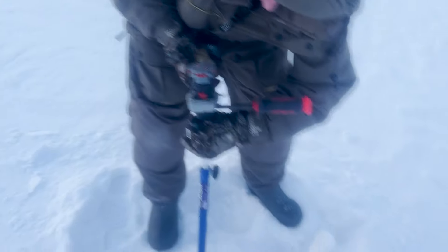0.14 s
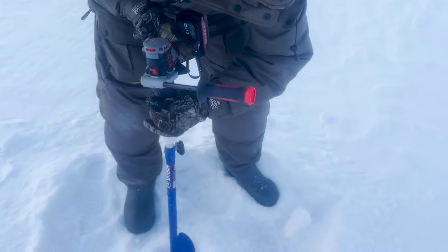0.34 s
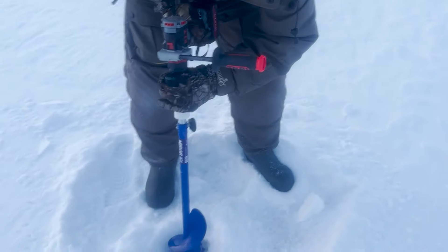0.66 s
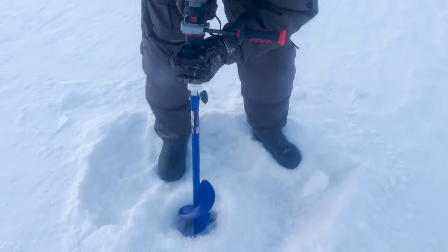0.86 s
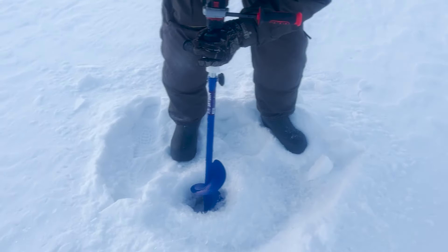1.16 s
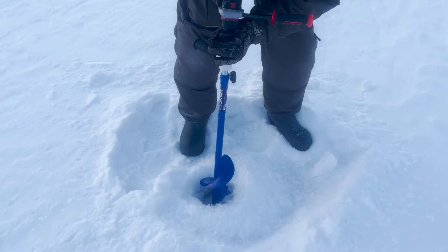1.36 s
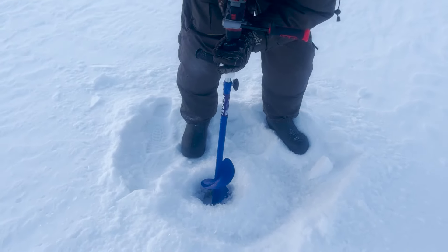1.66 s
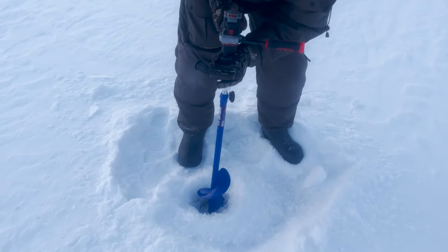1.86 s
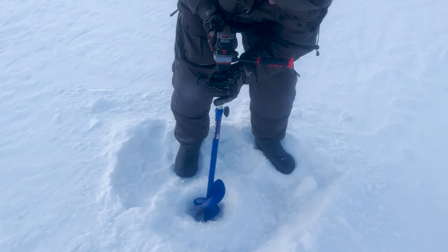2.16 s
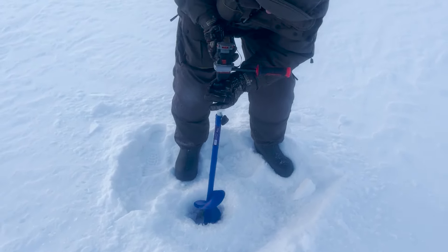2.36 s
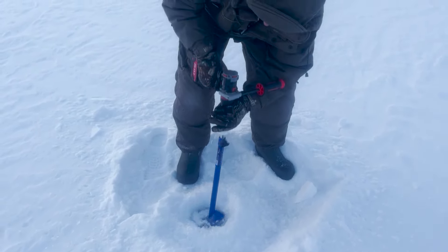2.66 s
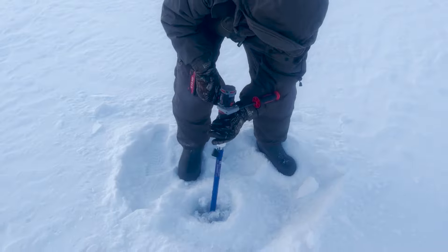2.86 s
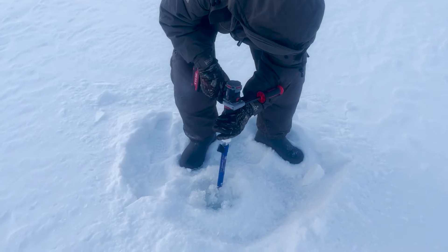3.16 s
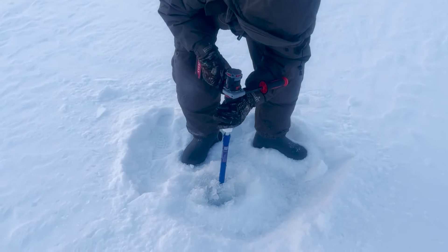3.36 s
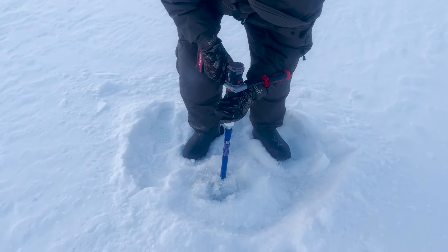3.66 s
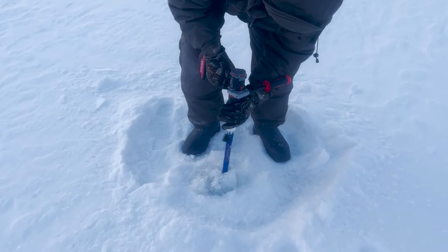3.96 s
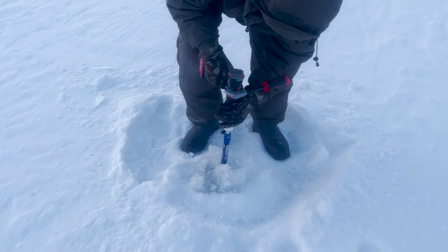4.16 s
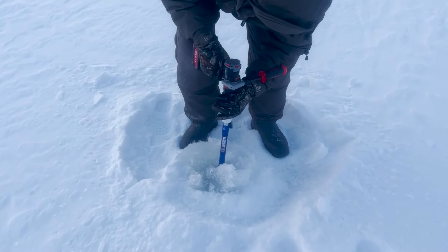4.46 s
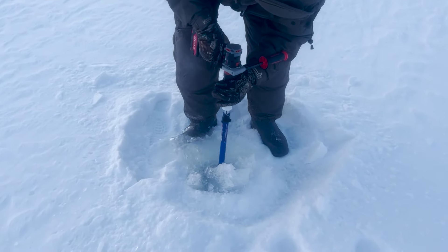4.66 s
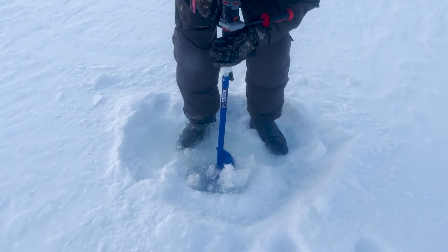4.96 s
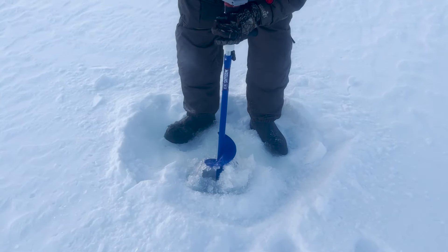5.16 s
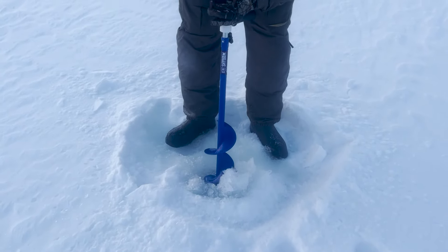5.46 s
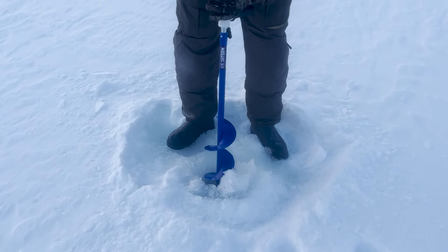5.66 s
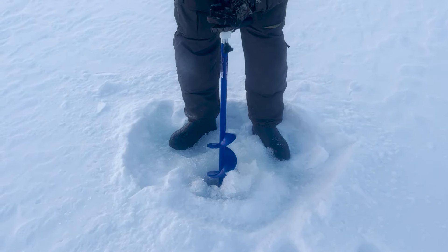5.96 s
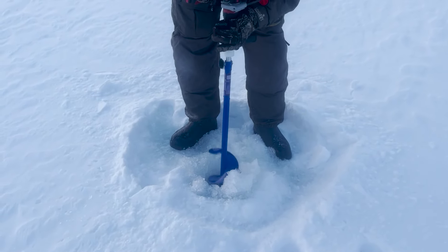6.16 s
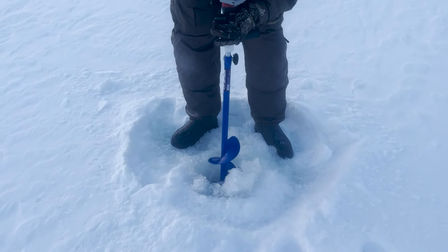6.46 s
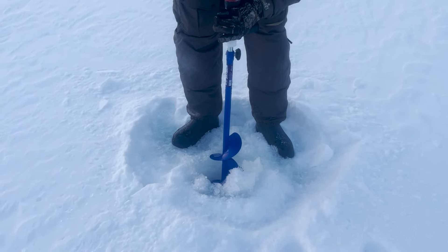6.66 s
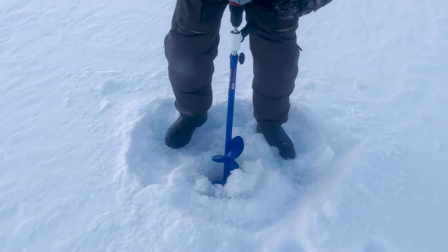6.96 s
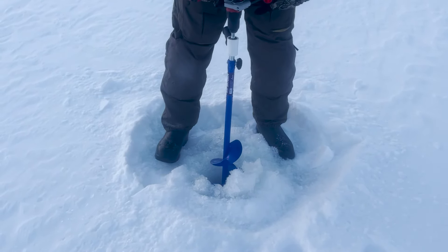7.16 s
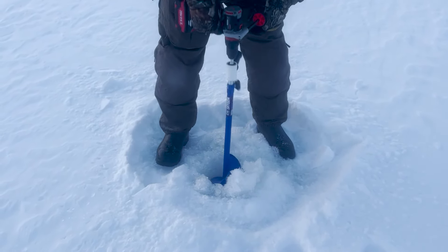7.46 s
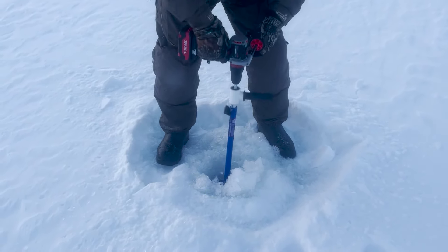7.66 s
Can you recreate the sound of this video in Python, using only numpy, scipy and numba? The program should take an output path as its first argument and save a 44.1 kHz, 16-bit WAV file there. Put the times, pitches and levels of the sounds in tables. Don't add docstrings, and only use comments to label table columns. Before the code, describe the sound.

A cordless drill already whining stops almost at once, leaving wind thumps and faint loose-ice rustle. Longer bursts follow, the motor labouring as blades crunch ice, with sharp clutch and ice cracks. Slush slaps as the auger is raised; a short, violent fourth burst nearly stalls among loud wet knocks, and a fifth runs lighter and higher. Close, dry stereo microphone in open snow.

```python
import sys
import numpy as np
from scipy import signal
from scipy.fft import rfft, irfft, next_fast_len
from scipy.io import wavfile
from scipy.ndimage import uniform_filter1d
from numba import njit

SR = 44100
rng = np.random.default_rng(int(sys.argv[2]) if len(sys.argv) > 2 else 0)


def amplitude_ratio(level_db):
    exponent = np.asarray(level_db, float) / 20
    return 10 ** exponent


def to_wav(s):
    ch = np.atleast_2d(s).T
    pcm = np.round(np.clip(ch, -1, 1) * 32767)
    wavfile.write(sys.argv[1], SR, pcm.astype(np.int16))


N = 344729


def rms_one(x):
    return x / np.sqrt(np.mean(x ** 2) + 1e-20)


def evened(x, seconds):
    power = uniform_filter1d(x ** 2, size=round(seconds * SR))
    return rms_one(x / np.sqrt(power + 1e-20))


def in_time(rows):
    s, *columns = np.transpose(rows)
    return [np.interp(np.arange(N) / SR, s, c) for c in columns]


def swells(rows, rise, fall):
    t = np.arange(N) / SR
    levels = []
    for (s, hold, db), down in zip(rows, np.broadcast_to(fall, len(rows))):
        before, after = np.clip(s - t, 0, None), np.clip(t - s - hold, 0, None)
        levels.append(db - rise * before - down * after)
    return np.max(levels, axis=0)


def coloured(x, spectrum):
    size = next_fast_len(N)
    hz, db = np.transpose(spectrum)
    grid = np.arange(size // 2 + 1) * SR / size
    gain = amplitude_ratio(np.interp(np.log(grid + 1), np.log(hz), db, left=-70, right=-70))
    return rms_one(irfft(rfft(x, size) * gain, size)[:N])


def drift(rate):
    r = np.exp(-2 * np.pi * rate / SR)
    return rms_one(signal.lfilter([1], [1, -2 * r, r * r], rng.standard_normal(N + SR))[SR:])


def resonance(x, hz, width_hz):
    r = np.exp(-np.pi * width_hz / SR)
    poles = [1, -2 * r * np.cos(2 * np.pi * hz / SR), r * r]
    return signal.lfilter([(1 - r * r) / 2, 0, (r * r - 1) / 2], poles, x)


@njit
def moving_resonance(x, hz, r, sr):
    y = np.zeros(len(x))
    for i in range(2, len(x)):
        drive = (1 - r * r) / 2 * (x[i] - x[i - 2])
        y[i] = drive + 2 * r * np.cos(2 * np.pi * hz[i] / sr) * y[i - 1] - r * r * y[i - 2]
    return y


def grains(per_s, spread_db):
    sizes = amplitude_ratio(spread_db * np.minimum(rng.exponential(1, N), 5)) * rng.choice([-1, 1], N)
    return sizes * (rng.random(N) < per_s / SR) + 1e-18


def add(out, s, sound):
    i = round(s * SR)
    out[i:i + len(sound)] += sound[:N - i]


def knocks(events, rise_cycles, ring_cycles):
    out, t = np.zeros(N), np.arange(SR // 16) / SR
    for (s, db, hz), phase in zip(events, rng.uniform(0, 2 * np.pi, (len(events), 1))):
        shape = (1 - np.exp(-t * hz / rise_cycles)) ** 2 * np.exp(-t * hz / ring_cycles)
        add(out, s, amplitude_ratio(db) * shape / shape.max() * np.sin(2 * np.pi * hz * t + phase))
    return out


def snaps(events, spectrum, fade_s):
    out, t = np.zeros(N), np.arange(SR // 40) / SR
    for (s, db), noise in zip(events, rng.standard_normal((len(events), len(t)))):
        add(out, s, amplitude_ratio(db) * noise * np.exp(-t / fade_s))
    return coloured(out, spectrum) * np.sqrt(np.mean(out ** 2)) * amplitude_ratio(-1.0)


# hz, level_db (per Hz)
CHANNEL_NOISE = [(2000, -40), (4500, 11), (5000, 6), (5600, -1), (8000, -13), (13500, -16.5), (14100, -40)]


def channel_hiss(hiss_db):
    return amplitude_ratio(hiss_db - 14.0) * np.array([coloured(x, CHANNEL_NOISE) for x in rng.standard_normal((2, N))])


# full_s, hold_s, level_db
FIZZ_SWELLS = [
    (.36, .42, -68),
]
# hz, level_db (per Hz)
FIZZ_SPECTRUM = [(5300, -23), (5800, 0), (6300, -4), (6800, -20)]


def fizz():
    return amplitude_ratio(swells(FIZZ_SWELLS, 900, 60)) * coloured(rng.standard_normal(N), FIZZ_SPECTRUM)


# hz, level_db (per Hz)
CHIRP_SPECTRUM = [(9000, -12), (11500, -4), (13500, 2), (14500, -6), (15850, 7)]


def chirp(hiss_db):
    first_s, every_s, level_db = .078, .2146, -52.5
    since = (np.arange(N) / SR - first_s) % every_s
    shape = np.clip(since / 0.0021, 0, 1) * np.exp(-(since / 0.044) ** 2)
    quiet = np.clip((-44 - hiss_db) / 6, 0, 1)
    floor = amplitude_ratio(np.minimum(hiss_db, -59) - 9)
    return quiet * (amplitude_ratio(level_db) * shape + floor) * coloured(rng.standard_normal(N), CHIRP_SPECTRUM)


# peak_s, hold_s, level_db
WIND_GUSTS = [(0, 0.17, -23.5), (.33, 0.028, -23.5), (.55, 0.014, -26), (.82, 0.16, -32),
              (1.27, 0.068, -32.5), (1.5, 0.16, -38), (1.8, 0.32, -41), (2.5, 0.025, -40),
              (2.74, 0.77, -36.5), (3.45, 0.059, -40), (3.75, 0.069, -42), (4.1, 0.22, -34.5),
              (4.65, 0.028, -41), (5.0, 0.21, -45), (5.8, 0.087, -40.5), (6.25, 0.22, -41.5),
              (6.64, 0.22, -37.5), (7.19, .01, -34.5), (7.41, 0.18, -33), (7.6, 0.14, -37)]
# hz, level_db (per Hz)
WIND_SPECTRUM = [(22, -35), (40, -5), (55, -2.5), (67, 4.5), (85, -2), (150, -5), (300, -11), (480, -21),
                 (800, -27)]


def wind():
    calm_db = -47.5
    wind_db = np.maximum(swells(WIND_GUSTS, rise=76, fall=105), calm_db)
    eddies, air = drift(8.9), coloured(rng.standard_normal(N), WIND_SPECTRUM)
    low = signal.sosfiltfilt(signal.butter(2, 100, fs=SR, output="sos"), air)
    lumps = amplitude_ratio(6.1 * np.roll(eddies, SR)) * low + amplitude_ratio(6.6 * eddies) * (air - low)
    return amplitude_ratio(wind_db) * evened(lumps, seconds=0.15)


# start_s, peak_db, pitch_hz
WIND_SLAPS = [(0.056, -28, 183), (0.104, -10.5, 154), (0.104, -6.5, 302), (0.151, -17, 155),
              (0.25, -18.5, 145), (0.353, -17.5, 296), (0.439, -36, 258), (0.484, -15, 360),
              (0.522, -15.5, 228), (0.607, -28, 148), (0.792, -33, 149), (0.85, -23, 285),
              (0.879, -25, 177), (1.193, -28.5, 277), (1.251, -25, 294), (1.315, -34, 237),
              (1.488, -27, 187), (1.596, -25.5, 184), (1.682, -25, 153), (1.898, -34, 160),
              (0.374, -14.5, 141), (2.534, -15, 235), (2.789, -18, 260), (3.048, -21.5, 210),
              (4.029, -21.5, 296), (4.231, -25.5, 132), (6.659, -29, 328), (7.173, -25, 292),
              (7.183, -13.5, 443), (7.194, -33, 317), (1.93, -39, 198), (1.975, -34, 188),
              (3.07, -20.5, 327.4), (7.423, -13, 410)]
# start_s, peak_db, pitch_hz
WIND_SLAP_TOPS = [(0.074, -18, 406), (0.121, -11.5, 352), (0.372, -17, 386), (3.046, -22.5, 365),
                  (0.448, -34, 576), (0.508, -20.5, 494), (0.793, -23, 412), (1.49, -25, 590),
                  (1.683, -31.5, 410), (1.806, -32, 810), (5.576, -36, 765)]


def slaps():
    thumps = knocks(WIND_SLAPS, rise_cycles=0.7, ring_cycles=0.66)
    return thumps + knocks(WIND_SLAP_TOPS, rise_cycles=0.78, ring_cycles=0.98)


# start_s, peak_db
CLOTH_SNAPS = [(1.2271, -38), (1.2497, -31.5), (1.323, -46), (1.4212, -40), (1.8068, -52), (1.963, -52),
               (2.0023, -44), (2.1792, -48), (3.26, -52), (5.409, -35), (5.7188, -35.5), (6.9268, -51)]
# hz, level_db (per Hz)
CLOTH_SPECTRUM = [(500, 22.5), (1500, 7.5), (5000, 7.5), (12000, -6), (16000, 0)]


def crackle():
    return snaps(CLOTH_SNAPS, CLOTH_SPECTRUM, fade_s=0.0058)


# start_s, peak_db
SHARP_CRACKS = [
    (3.2031, -21),
    (4.2174, -11.5),
    (4.7744, -22),
    (5.1364, -28),
    (5.3208, -26),
    (6.4544, -24),
    (6.5144, -24),
    (6.7002, -33),
]
# hz, level_db (per Hz)
CRACK_SPECTRUM = [(900, -7), (2600, 6), (5000, -3), (9000, -9), (14000, -12)]


def cracks():
    return amplitude_ratio(-6) * snaps(SHARP_CRACKS, CRACK_SPECTRUM, fade_s=0.0043)


# time_s, level_db, hole_hz
LOOSE_ICE = [(0.35, -45.5, 440), (.46, -59, 430), (.56, -47, 433), (.7, -50, 426), (.98, -47, 407),
             (1.02, -50, 420), (1.22, -52, 417), (1.37, -47, 395), (1.6, -49.5, 392), (1.66, -58.5, 400),
             (2.15, -66, 412), (2.36, -56, 350), (2.44, -44, 300), (2.49, -39, 260), (2.505, -55, 240),
             (2.53, -38.5, 240), (3.16, -36, 281), (3.24, -44, 264), (3.37, -46, 260), (3.385, -61, 253),
             (3.435, -66, 253), (3.455, -44.5, 260), (3.76, -48, 355), (3.93, -36, 262), (4.4, -37, 293),
             (4.7, -41, 524), (4.74, -46, 1840), (4.8, -36.5, 940), (4.89, -38.5, 465), (5.05, -38.5, 420),
             (5.2, -39.5, 580), (5.33, -40.5, 550), (5.39, -42.5, 536), (5.45, -46.5, 550),
             (5.56, -50, 567), (6.55, -39, 540), (6.575, -48.5, 410), (6.9, -53, 433), (7.19, -48, 456),
             (7.225, -45, 450), (7.25, -60, 910), (7.315, -46, 870), (7.335, -30.5, 804), (7.82, -48, 680)]
# full_s, hold_s, level_db, fall_db_per_s
CUTS_AND_SCRAPES = [(1.964, 0.0061, -55.5, 800), (2.058, 0.075, -54, 500), (2.184, 0.15, -48, 306),
                    (0.294, 0.054, -39, 904), (4.783, 0.069, -35, 200), (1.815, .002, -47.5, 1500),
                    (2.539, .02, -26, 100), (2.58, .01, -20.5, 149), (2.803, 0.0025, -26.5, 600),
                    (5.971, 0.023, -20.5, 250), (6.032, 0.092, -16.5, 292), (6.215, 0.035, -18.5, 77),
                    (6.378, 0.025, -24, 400), (7.024, 0.065, -46, 200), (4.767, 0.015, -36.5, 300),
                    (7.276, 0.016, -39, 300), (7.342, 0.0076, -36, 300), (7.415, 0.0068, -23, 83),
                    (7.468, 0.16, -26.5, 72)]


def ice_levels():
    loose_db, hole_hz = in_time(LOOSE_ICE)
    cuts = np.array(CUTS_AND_SCRAPES)
    return np.maximum(loose_db, swells(cuts[:, :3], rise=450, fall=cuts[:, 3])), hole_hz


# hz, level_db (per Hz)
ICE_SPECTRUM = [(150, -73), (300, -3.5), (600, 5.5), (1300, 9), (2000, 6), (3500, 1), (6000, -8)]


def ice(ice_db, hole_hz):
    chips = grains(per_s=3500 * amplitude_ratio(2.8 * drift(30)), spread_db=3.2)
    pitches = np.geomspace(300, 4500, 18)
    dealt = rng.integers(0, len(pitches), N)
    pieces = np.zeros(N)
    for k, hz in enumerate(pitches):
        pieces += resonance(chips * (dealt == k) + 1e-18, hz, hz / 13) * np.sqrt(1000 / hz)
    crunch = coloured(rms_one(pieces) + amplitude_ratio(-4.0) * rms_one(chips), ICE_SPECTRUM)
    r = np.exp(-np.pi * 90 / SR)
    hole = rms_one(moving_resonance(chips, hole_hz, r, SR))
    return amplitude_ratio(ice_db) * evened(amplitude_ratio(6.0) * crunch + amplitude_ratio(0.5) * hole, seconds=0.099)


# start_s, peak_db, pitch_hz
CHIP_KNOCKS = [(2.526, -24.5, 703), (2.568, -26, 1750), (2.613, -15.5, 1560), (2.7, -26, 670),
               (2.788, -25, 800), (3.887, -34, 1760), (3.949, -28, 1210), (4.667, -24, 1790),
               (4.852, -28.5, 1050), (4.864, -32, 874), (0.318, -30, 820), (4.683, -33, 540),
               (5.946, -24, 936), (5.976, -8, 609), (6.029, -20, 520), (6.111, -7, 514), (6.214, -23, 462),
               (6.338, -17, 1830), (6.358, -17.5, 457), (6.384, -17.5, 477), (7.612, -17, 565),
               (7.7, -15.5, 768), (4.82, -30.5, 617), (6.511, -22, 523), (6.539, -25, 570),
               (7.262, -23.5, 1500), (7.257, -25.5, 1094), (7.33, -34, 723), (7.257, -36, 282),
               (7.258, -34, 720), (7.338, -32, 327), (7.401, -19.5, 1250), (7.535, -22.5, 553),
               (7.561, -16, 792), (7.613, -16.5, 785), (7.668, -21.5, 756)]


def chip_knocks():
    return knocks(CHIP_KNOCKS, rise_cycles=1.0, ring_cycles=7.3)


# start_s, peak_db, pitch_hz
SLUSH_SLAPS = [(2.522, -16, 252), (2.549, -14, 239.4), (2.572, -22, 252), (2.592, -22, 242),
               (2.715, -22, 260), (2.745, -26, 252.5), (2.865, -26.5, 241), (2.594, -10, 1540),
               (2.649, -12, 1120), (3.154, -23, 1900), (4.789, -29, 1020), (4.957, -25.5, 615),
               (5.005, -41, 510), (5.029, -27, 385), (5.076, -30, 402), (5.127, -26.5, 452),
               (5.159, -23.5, 517), (5.184, -24, 563), (5.215, -26, 605), (5.289, -41, 860),
               (5.322, -23.5, 746), (5.408, -26, 515), (5.017, -31, 1150), (5.08, -32, 800),
               (6.308, -19, 390), (5.957, -12, 1070), (5.962, -12.5, 586), (5.995, -0.5, 565),
               (6.044, -9.5, 532), (6.063, -5, 523), (6.076, -9.5, 620), (6.091, -9, 510),
               (6.127, -10, 510), (6.139, -6, 568), (6.231, -10, 517), (6.249, -8.5, 1090),
               (6.261, -11, 485), (6.289, -13.5, 573), (6.299, -9.5, 1040), (6.32, -15, 1230),
               (6.344, -12, 1900), (6.454, -17.5, 500), (6.479, -24, 446), (7.429, -14, 1560),
               (7.579, -15, 856)]


def slush():
    return amplitude_ratio(-7) * knocks(SLUSH_SLAPS, rise_cycles=1.05, ring_cycles=5.7)


# start_s, peak_db, pitch_hz
STEEL_TAPS = [(0.3357, -20, 5060), (0.7931, -39, 2300), (0.9814, -41, 1910), (1.3663, -39, 1700),
              (1.961, -46, 1370), (3.2037, -23, 5100), (3.808, -20, 2650), (4.2168, -10, 2555),
              (4.751, -19, 2760), (4.7744, -24, 4980), (5.016, -40, 1200), (5.1347, -30, 1530),
              (5.3218, -35, 1470), (6.0796, -12, 2300), (6.0944, -17, 2210), (6.1114, -29, 1430),
              (6.5788, -35, 3800), (6.6089, -48, 1130), (6.6294, -45.5, 1260), (6.7002, -34, 2970),
              (6.8942, -52, 1290), (6.9255, -42, 1610), (7.018, -39, 1790), (7.1501, -46, 1700)]


def taps():
    return amplitude_ratio(-6) * knocks(STEEL_TAPS, rise_cycles=0.57, ring_cycles=22.0)


# full_s, hold_s, level_db
FLIGHT_RUBS = [
    (2.28, 0.0032, -41),
    (2.44, 0.04, -34.5),
    (2.53, 0.097, -27.5),
    (2.66, 0.084, -32.5),
    (2.8, 0.018, -37),
]


def flight():
    rub = resonance(grains(per_s=1700, spread_db=10.5), hz=659, width_hz=33)
    level_db = swells(FLIGHT_RUBS, rise=500, fall=597)
    return amplitude_ratio(level_db - 5.5) * evened(rub, seconds=0.114)


# pitch_hz, width_hz, level_db
SHELL_MODES = [(2744, 186, 10), (3406, 66, -0.5), (2560, 94, -14), (5620, 510, -5.5)]


def housing(x):
    modes = enumerate(SHELL_MODES)
    return sum((-1) ** k * amplitude_ratio(db) * resonance(x, hz, width) for k, (hz, width, db) in modes)


# full_s, hold_s, level_db
BATTERY_BUZZES = [
    (1.8, 0.09, -59),
    (6.7, .01, -51),
]


def buzz():
    return amplitude_ratio(swells(BATTERY_BUZZES, 600, 400)) * rms_one(housing(grains(per_s=4000, spread_db=1.5)))


# start_s, peak_db, low_part_db
DRILL_TICKS = [(0.332, -49, 2), (2.269, -29, -8), (2.526, -31, -11), (2.7923, -37, 24), (3.2002, -29.5, -4),
               (3.769, -26, -24), (3.9494, -27, -14), (4.217, -25, -11), (4.774, -28, -7),
               (5.8447, -26, -2), (6.42, -27.5, 0), (7.254, -33, 6), (7.267, -23, -1), (7.7957, -36, -4)]


def ticks():
    high, low, t = np.zeros(N) + 1e-18, np.zeros(N) + 1e-18, np.arange(SR // 20) / SR
    for (s, db, low_db), noise in zip(DRILL_TICKS, rng.standard_normal((len(DRILL_TICKS), len(t)))):
        add(high, s, amplitude_ratio(db) * noise * np.exp(-t / 0.0075))
        add(low, s, amplitude_ratio(db + low_db) * noise * np.exp(-t / 0.011))
    return amplitude_ratio(7.0) * housing(high) + amplitude_ratio(-9.0) * high + amplitude_ratio(-21) * resonance(low, 1700, 1000)


# deepest_s, share_of_speed_lost,
# fall_s, recovery_s
BLADE_JAMS = [
    (2.604, .12, 0.043, 0.019),
    (2.739, 0.31, 0.03, 0.024),
    (2.797, .1, 0.0095, 0.045),
    (2.818, .24, 0.0082, .042),
    (7.84, 0.19, 0.04, 0.087),
]


def rotor(burst, load):
    spin_up_s, spin_up_curve, coast_s = 0.105, 1.95, 0.074
    t = np.arange(N) / SR
    press, release, braking, _, _ = burst
    hz, current_db = in_time(load)
    hz = hz * (1 - np.exp(-(np.clip(t - press, 0, None) / spin_up_s) ** spin_up_curve))
    for s, share, fall_s, recover_s in BLADE_JAMS:
        falling = np.clip(1 + (t - s) / fall_s, 0, 1)
        hz = hz * (1 - share * falling * np.exp(-np.clip(t - s, 0, None) / recover_s))
    hz = np.clip(hz - braking * np.clip(t - release, 0, None), 60, None)
    starts = np.clip((t - press + 0.0014) / 0.0022, 0, 1)
    running = starts * np.clip((release + coast_s - t) / 0.0053, 0, 1)
    return uniform_filter1d(hz, size=SR // 110), current_db, running


# press_s, release_s, braking_hz_per_s, gear_mesh_db, fan_db
TRIGGER = [
    (-.5, 0.276, 16900, -34.5, -42),
    (2.272, 3.142, 24200, -34.5, -38.5),
    (3.768, 4.702, 22100, -36, -40.5),
    (5.837, 6.363, 19800, -33, -33.5),
    (7.263, 7.747, 8300, -33.5, -45.5),
]
# time_s, whine_hz at full speed, current_db
BURST_LOAD = [
    [(0, 2850, -5), (.13, 2880, -5.5), (.165, 2908, -1.5), (.2, 2885, -5.5), (.236, 2936, -3.5),
     (.258, 2894, -24), (.278, 2750, -7)],
    [(2.35, 3337, -10), (2.415, 3330, -9), (2.445, 3230, -28), (2.515, 3270, -27), (2.535, 2660, -8),
     (2.555, 2772, 1.5), (2.66, 2607, -1), (3.0, 2645, 2), (3.14, 2730, 1)],
    [(3.95, 2687, 1.5), (4.07, 2664, 0.5), (4.14, 2740, -0.5), (4.22, 2710, 0.5), (4.315, 2760, 1),
     (4.52, 2823, 1), (4.705, 2814, 0)],
    [(6.03, 2712, -2.5), (6.052, 2616, 1.5), (6.078, 1912, -12), (6.104, 1917, -9), (6.122, 2480, 1),
     (6.14, 2600, -3), (6.2, 2743, 2), (6.28, 2783, -2), (6.35, 2800, -3)],
    [(7.42, 2967, -2), (7.465, 2972, -1), (7.53, 3015, 0.5), (7.595, 3010, -2.5), (7.665, 3013, 0.5),
     (7.75, 3135, 8), (7.8, 3180, -3)],
]


def fan():
    total = np.zeros(N)
    for burst, load in zip(TRIGGER, BURST_LOAD):
        hz, _, running = rotor(burst, load)
        total += running * amplitude_ratio(burst[4] + 7.5 * np.log2(hz / 2800))
    return total


# full_s, hold_s, level_db
SLEEVE_RUSTLES = [(.4, 0.056, -60.5), (.56, 0.16, -65), (.74, 0.026, -67), (.9, 0.063, -66),
                  (1.3, 0.17, -72), (1.5, 0.14, -63.5), (3.3, 0.055, -62), (3.47, .08, -57),
                  (6.62, 0.012, -56.5), (6.83, 0.053, -56), (7.05, 0.12, -55)]


def hiss_level(ice_db):
    friction_db, air_db, rustle_db_per_s = -14.5, -77, 117
    rustle_db = swells(SLEEVE_RUSTLES, rustle_db_per_s, rustle_db_per_s)
    power = fan() ** 2 + amplitude_ratio(ice_db + friction_db) ** 2 + amplitude_ratio(air_db) ** 2 + amplitude_ratio(rustle_db) ** 2
    return 10 * np.log10(power)


# hz, level_db (per Hz)
HISS_SPECTRUM = [(300, -40), (1000, 1.5), (2500, 7), (3200, 5.5), (4500, 8.5), (6000, 5.5), (9000, 5),
                 (12500, 2), (13700, 0), (14100, -17), (15800, -40)]
# pitch_hz, width_hz, level_db
GEARBOX_MODES = [(1676, 430, -2.5), (3600, 68, -6.5), (4990, 90, -14.5)]


def hiss(hiss_db):
    air = coloured(grains(per_s=9000, spread_db=-0.5), HISS_SPECTRUM)
    air = air + sum(amplitude_ratio(db + 4) * resonance(air, hz, width) for hz, width, db in GEARBOX_MODES)
    return amplitude_ratio(hiss_db + 6 + 1.61 * drift(45.0) + 1.85 * drift(4.5)) * air


# start_s, share_of_speed_lost
BLADE_BITES = [(.005, 0.02), (0.135, 0.04), (0.2, 0.06), (2.991, 0.011), (3.037, 0.021), (4.021, 0.045),
               (4.061, 0.019), (4.143, 0.031), (4.191, 0.023), (4.209, 0.013), (4.318, 0.063),
               (4.352, 0.023), (4.44, 0.024), (4.534, 0.041), (4.566, 0.013), (4.647, 0.031),
               (4.675, 0.022), (6.222, 0.067), (6.282, 0.073), (7.484, .02), (7.533, 0.018), (7.607, 0.054),
               (7.671, 0.025)]


def sag(fall_s, recover_s):
    lost, t = np.zeros(N), np.arange(SR // 5) / SR
    shape = (1 - np.exp(-t / fall_s)) ** 2 * np.exp(-t / recover_s)
    for s, share in BLADE_BITES:
        add(lost, s, share * shape / shape.max())
    return 1 - lost


# line_hz, level_db
CASE_GAIN = [(800, -10), (1400, -4), (2700, -1), (3200, -3.5), (3700, 1.5), (4400, -1), (5000, -1),
             (5600, -1.5), (7000, -0.5), (9500, -3.5)]


def case(hz):
    return amplitude_ratio(np.interp(hz, *np.transpose(CASE_GAIN)))


WINDING_MULTIPLES = [.5, 1.375, 1.75, 2, 2.5, 2.875]
WINDING_LEVELS = [-32.5, -48, -50, -38.5, -39, -45.5]


def winding_lines(turn, hz, flutter):
    out = np.zeros(N)
    for j, (k, db) in enumerate(zip(WINDING_MULTIPLES, WINDING_LEVELS)):
        strength = amplitude_ratio(db) * np.minimum(k * hz / 2600, 1) ** 2 * case(k * hz)
        out += strength * np.sin(k * turn) * flutter[j % 2]
    return out


# multiple of the whine, level_db (relative to the mesh)
MESH_LINES = [(1.5, -5), (1.626, 6), (1.874, -13), (3.251, 5)]


def mesh_lines(turn, hz, flutter):
    out = np.zeros(N)
    for j, (k, db) in enumerate(MESH_LINES):
        out += amplitude_ratio(db) * case(k * hz) * np.sin(k * turn) * flutter[2 - j % 2]
    return out


# whine_hz, level_db
WHINE_GAIN = [(1000, -69), (1800, -35), (2150, -30), (2350, -25.5), (2600, -17.5), (2780, -19), (2900, -27),
              (3150, -48)]
START_LEVELS = [-1, -10, 3.5, 4.5, 4]
HALF_LEVELS = [-39.5, -37.5, -33.5, -21, -37]


def motor(wobble, shell_db):
    out, upper, t = np.zeros(N), np.zeros(N), np.arange(N) / SR
    rattle = rms_one(housing(grains(per_s=6000, spread_db=-10.0)))
    left = sag(fall_s=.005, recover_s=.03)
    speed = left * (1 + wobble * drift(77.3))
    flutter = [amplitude_ratio(2.4 * drift(15.0)) for k in range(3)]
    regrip_s = 7.798
    for burst, load, start_db, half_db in zip(TRIGGER, BURST_LOAD, START_LEVELS, HALF_LEVELS):
        press, release, _, mesh_db, _ = burst
        hz, current_db, running = rotor(burst, load)
        turn = 2 * np.pi * np.cumsum(hz * speed) / SR
        current = np.clip(np.maximum(release - t, t - regrip_s) / 0.0033, 0, 1)
        starting = np.exp(-((t - press - 0.063) / 0.025) ** 2)
        shake = amplitude_ratio(-49) + amplitude_ratio(-11.5) * (1 - left)
        shake += amplitude_ratio(-59) * np.exp(-((t - release) / 0.009) ** 2)
        shake += amplitude_ratio(-37 + start_db) * starting
        whine_db = current_db + np.interp(hz * left, *np.transpose(WHINE_GAIN))
        whine = current * amplitude_ratio(whine_db + 4.0) * np.sin(turn)
        half = current * amplitude_ratio(half_db - 13.0 - 0.25 * current_db) * (hz / 2800) ** 2
        half = half * flutter[2] * np.sin(turn / 2)
        out += running * (whine + shake * rattle + half)
        slowing = -np.gradient(hz) * np.where(t < release, SR, SR / 2) / 23000.0
        upper_db = (2.5 + start_db) * starting + 2.5 * (0.5 - current) - 7 * np.clip(slowing, 0, 2)
        mesh_db = mesh_db + 22.5 * np.log2(hz / 2800)
        lines = current * amplitude_ratio(0.098 * current_db) * winding_lines(turn, hz, flutter)
        lines += amplitude_ratio(mesh_db - 6.0) * mesh_lines(turn, hz, flutter)
        upper += running * amplitude_ratio(upper_db) * lines * np.sqrt(hz / 2800)
    return out + upper + amplitude_ratio(shell_db) * housing(upper)


# pitch_hz, right_leads_rad, left_minus_right_db
STEREO_RESPONSE = [(260, -0.0033, 0.16), (520, 1.26, -3), (830, 0.75, -2.5), (1120, 0.51, -0.5),
                   (1700, 0, -1.5), (2470, -1.82, 0.5), (2660, -1.66, 0.7), (3170, -1.8, -4.5),
                   (3800, -1.67, -4.5), (4700, -1.83, -6.5), (4870, -0.29, -3.5)]
# pitch_hz, right_leads_rad, left_minus_right_db
STEREO_DELAY = [(hz, -k * np.pi, 0) for hz, k in ((5800, 1), (7700, 2), (8200, 2), (10200, 3), (12200, 4),
              (12800, 4), (14200, 5))]


def stereo(x):
    size = next_fast_len(N + SR // 10)
    hz, lead, db = np.transpose([(0, 0, 0)] + list(STEREO_RESPONSE) + list(STEREO_DELAY))
    grid = np.arange(size // 2 + 1) * SR / size
    half = amplitude_ratio(np.interp(grid, hz, db) / 2) * np.exp(-.5j * np.interp(grid, hz, lead))
    return irfft(rfft(x, size) * np.array([half, 1 / half]), size)[:, :N]


# time_s, drill_left_minus_right_db, cross_wind_db
VIEW_TURN = [
    (.3, -7, -33),
    (2.2, 0, -33),
    (6.3, 0, -30),
    (7, 0, -21),
]


def scene():
    ice_db, hole_hz = ice_levels()
    hiss_db = hiss_level(ice_db)
    lean_db, cross_db = in_time(VIEW_TURN)
    air = wind() + slaps() + crackle() + cracks()
    hole = ice(ice_db, hole_hz) + chip_knocks() + flight() + slush() + taps()
    drill = motor(wobble=0.00528, shell_db=11.5) + ticks() + hiss(hiss_db) + buzz()
    own_wind = amplitude_ratio(cross_db) * wind() * [[1], [-1]]
    background = channel_hiss(hiss_db) + own_wind + chirp(hiss_db) + fizz()
    return stereo(drill) * amplitude_ratio(lean_db * [[.5], [-.5]]) + stereo(hole + air) + background


def low_pass(x):
    return signal.sosfilt(signal.butter(12, 15920, fs=SR, output="sos"), x)


def record(dry):
    rounded = 1.1 * np.tanh(dry / 1.1)
    return low_pass(rounded)


dry = scene()
out = record(dry)
to_wav(out)
```